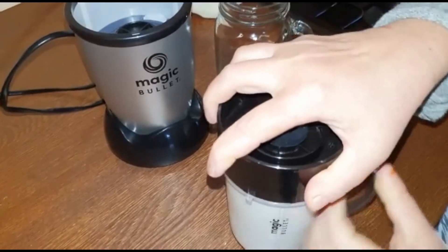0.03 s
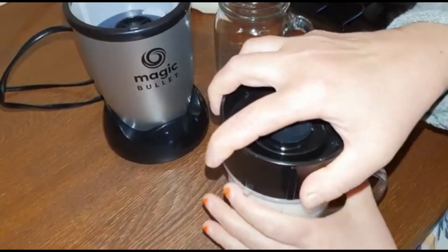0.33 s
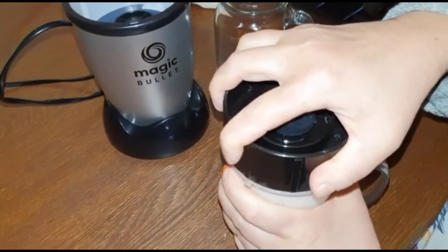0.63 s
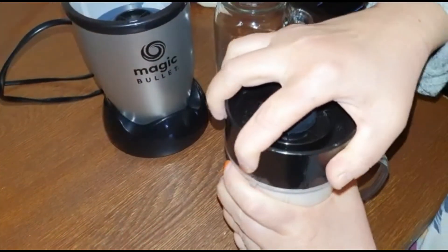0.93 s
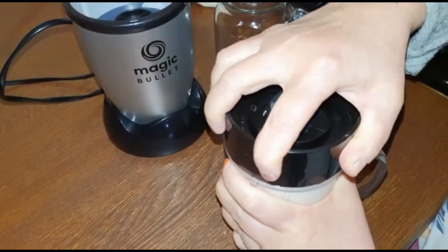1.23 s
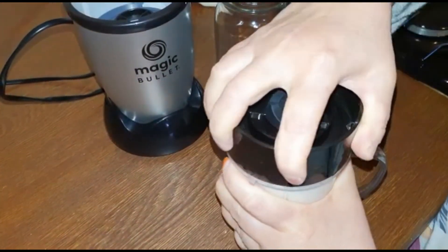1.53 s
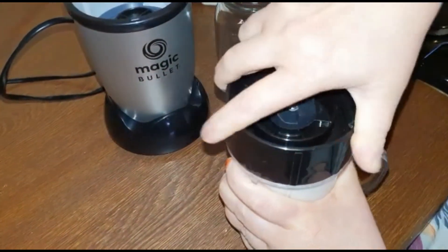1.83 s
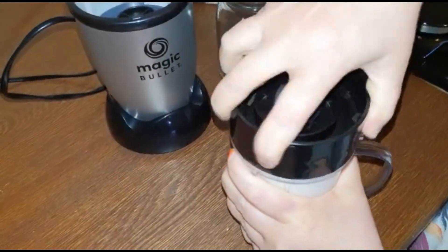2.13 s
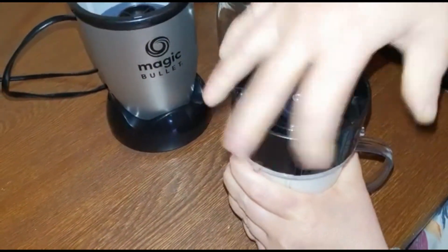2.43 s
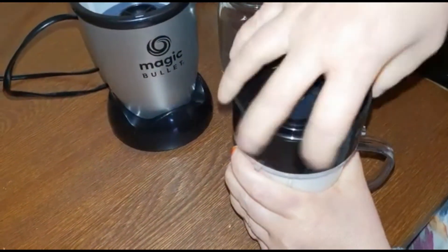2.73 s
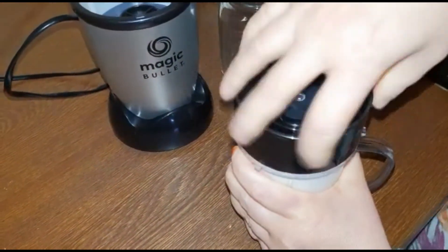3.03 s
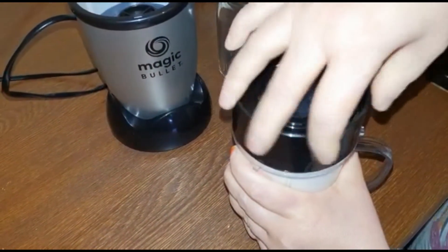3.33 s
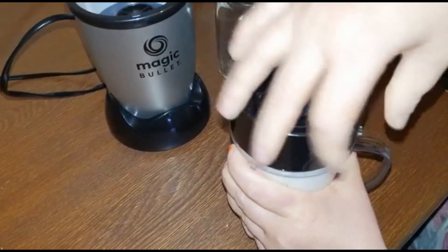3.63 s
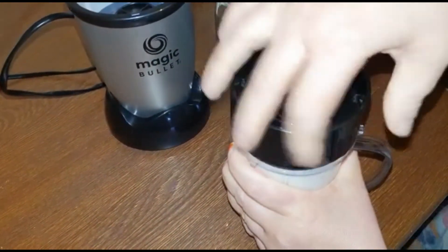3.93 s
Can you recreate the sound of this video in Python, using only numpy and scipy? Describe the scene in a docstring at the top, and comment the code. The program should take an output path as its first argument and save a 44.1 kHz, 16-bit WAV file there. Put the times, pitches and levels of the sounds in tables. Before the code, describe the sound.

A plastic lid twisted onto a cup, with clacks, hollow knocks and short gritty rubs.

```python
"""A hard plastic lid is screwed onto a cup held on a wooden table, in a small humming room.
First a faint squeak of the grip, then the loose lid clacks on the rim, the hollow cup knocks and the
table thumps under the push of the hand. After a second's lull the twists begin, each a short gritty
rub of the threads, with ticks as they catch and scuffs as the fingers regrip. From two seconds on the
clacks, knocks and thumps crowd in to the end, and hard blows leave the air in the cup ringing."""
import sys
import numpy as np
from scipy import signal
from scipy.fft import rfft, irfft
from scipy.io import wavfile

SR = 44100
rng = np.random.default_rng(int(sys.argv[2]) if len(sys.argv) > 2 else 0)


def to_wav(sig):
    """Store sig (one row per channel, or 1-D mono) as 16-bit WAV at the path in sys.argv[1].

    Samples outside -1..1 are clipped; the rate is SR.
    """
    pcm = np.clip(np.atleast_2d(sig), -1, 1) * 32767
    pcm = np.round(pcm).astype(np.int16)
    wavfile.write(sys.argv[1], SR, pcm.T)  # frames by channels


N = 176400
TIME = np.arange(N) / SR
BLOW_TIME = TIME[:SR // 3]   # seconds since the start of one blow
RUB_PAN_DB = -3.5   # left minus right


def thread_rub():
    """Dense slips of plastic on plastic swell and brighten with each twist of the lid."""
    # The twists. Each row: moment of full speed, rise and hold, all in seconds, then relative level in dB.
    twists = [(1.587, 0.087, 0.052, -65.5), (1.951, 0.026, .05, -60), (2.011, 0.0067, 0.0062, -51),
              (2.052, .03, 0.16, -66), (2.195, 0.022, 0.032, -58.5), (2.295, 0.063, 0.016, -62),
              (2.606, .05, 0.036, -51.5), (2.7, .03, 0.039, -57), (2.977, 0.071, 0.026, -49.5),
              (3.25, 0.11, 0.035, -54), (3.498, 0.039, 0.057, -53.5), (3.787, 0.035, 0.043, -52.5)]
    # Tone of the rubbing threads. Each row: frequency in Hz, relative gain in dB.
    rub_tone = [(150, 0.5), (350, 15.5), (700, 0.5), (1600, -1.5), (2600, -8), (3600, -15), (4600, -8),
                (6200, -21), (7700, -30), (8300, -8.5), (9500, -15), (11000, -11.5), (14000, -27.5),
                (15600, -32)]
    rise_db, fall_db_per_s, flutter_db = 26, 457, 3.5
    stereo_spread, edge_hz, edge_db = 0.53, 11600, 8
    power = 0
    for start, rise, hold, db in twists:
        fade_in_db = rise_db * np.maximum(start - TIME, 0) / rise
        fade_out_db = fall_db_per_s * np.maximum(TIME - start - hold, 0)
        power = power + from_db(db - fade_in_db - fade_out_db) ** 2
    grit = rms_one(slips() + stereo_spread * slips() * [[1], [-1]])
    edge = butter([slips(), slips()], 2, edge_hz, "high")
    grit = grit + from_db(edge_db) * (power / power.max()) ** 0.6 * edge   # harder pressure adds top
    rub = grit * np.sqrt(power) * from_db(-flutter_db * drift(hz=54))
    return pan(colour(rub, rub_tone), RUB_PAN_DB)


def thread_ticks():
    """Now and then the threads catch with a tiny bright tick."""
    # The catches. Each row: start in seconds, level in dB.
    catches = [(0.461, -70), (1.563, -65), (1.589, -54), (1.613, -57), (2.198, -47), (2.607, -46),
               (2.644, -51), (2.719, -38.5), (2.944, -47.5), (3.567, -49), (3.791, -51)]
    # Tone of a tick. Each row: frequency in Hz, relative gain in dB.
    tick_tone = [(1500, 4), (3300, -16), (5000, -5.5), (7600, -21), (8400, 6.5), (9500, -4), (12000, -8),
                 (15500, -28)]
    ticks = np.zeros(N)
    for start, db in catches:
        add(ticks, start, from_db(db) * rng.standard_normal(len(BLOW_TIME)) * dying(BLOW_TIME, t60=0.0085))
    return pan(colour(ticks, tick_tone), RUB_PAN_DB)


def lid_clacks():
    """The lid hits the rim: it builds to a crack or snaps at once, rattles briefly and rings."""
    # Hits on the rim. Each row: moment in seconds, level in dB, treble gain in dB,
    # left minus right in dB, build-up time of the contact in seconds.
    hits = [(0.31, -44, -33, -2.5, 0.0012), (0.523, -53.5, -20, -9, 0.0028), (2.019, -36, -3, -3, 0.0019),
            (2.317, -46.5, 2.5, 0, 0.002), (2.491, -44, -8, -1.5, 0.00082), (2.595, -44.5, 3, 2, 0.0014),
            (2.723, -31, -10, -3.5, 0.0058), (2.951, -59, -8, 4, 0.00087), (2.994, -41, 4, 4, 0.0012),
            (3.031, -32.5, 3, -3.5, 0.0031), (3.234, -35, -1, -1.5, 0.0016),
            (3.248, -32, 7.5, -2.5, 0.00093), (3.3079, -28, 7, -5, 0.0002), (3.323, -42, 4, 4, 0.0022),
            (3.462, -52, -11, 2, 0.0013), (3.54, -48, 0, 0.5, 0.00086), (3.571, -29.5, 0.5, -1.5, 0.0028),
            (3.766, -47, -7, -1, 0.0093), (3.801, -42, 3.5, -2.5, 0.013), (3.83, -31, -1, -0.5, 0.0051),
            (3.842, -29.5, -5, -1, 0.0014), (3.978, -43.5, -31, -2, 0.00082)]
    # Tone of the crack. Each row: frequency in Hz, relative gain in dB.
    crack_tone = [(150, 0), (400, 6), (900, 6.5), (1800, -1), (2700, -6), (3700, -18.5), (5000, -20),
                  (7400, -41.5), (8500, -23.5), (12000, -33), (15500, -48)]
    # Stereo image of the contact noise. Each row: frequency in Hz, left-right correlation.
    crack_likeness = [(300, 0.81), (700, 0.44), (1300, 0.08), (3000, 0.35), (12000, 0.29)]
    crack_t60_s, rattle_t60_s, rattle_db, treble_hz = 0.0083, 0.046, -29, 2490
    snap_db, snap_width_s, snap_build_s = 17, 0.00009, 0.0007
    cracks, rings = np.zeros((2, 2, N))
    contact = stereo_noise(crack_likeness)
    dull, bright = butter(contact, 3, treble_hz, "low"), butter(contact, 3, treble_hz, "high")
    pulse = BLOW_TIME / snap_width_s * np.exp(1 - BLOW_TIME / snap_width_s)
    snap = np.diff(pulse, prepend=0)
    for start, db, treble_db, pan_db, build_s in hits:
        after, before = np.maximum(TIME - start, 0), np.maximum(start - TIME, 0)
        decay = dying(after, crack_t60_s) + from_db(rattle_db) * dying(after, rattle_t60_s)
        envelope = np.exp(-before / build_s) * decay
        cracks += pan(from_db(db) * envelope * (dull + from_db(treble_db) * bright), pan_db)
        abruptness = np.exp(-build_s / snap_build_s)   # only an abrupt contact snaps
        add(cracks, start, pan(from_db(db + snap_db) * abruptness * snap, pan_db))
        add(rings, start, pan(from_db(db) * lid_ring(), pan_db))
    return colour(cracks, crack_tone) + rings


def lid_ring():
    """The struck lid rings in damped modes, in a slightly different balance each time."""
    # Modes of the lid. Each row: frequency in Hz, level against the clack in dB, t60 in seconds.
    modes = [(444, -14.5, 0.11), (637, -6, 0.021), (790, -16.5, 0.13), (900, -14.5, 0.025),
             (1214.6, -13.5, 0.097), (1441, -19, 0.11), (1593, -25, 0.18), (1724, -13, 0.051),
             (1842, -26, 0.081), (2434, -23.5, 0.062)]
    ring = 0
    for hz, db, t60 in modes:
        gain = from_db(db + rng.normal(0, 0.68)) * rng.choice([-1, 1])
        ring = ring + gain * np.sin(2 * np.pi * hz * BLOW_TIME) * dying(BLOW_TIME, t60)
    return ring * attack(BLOW_TIME, rise_s=0.0007)


def cup_knocks():
    """The hollow cup knocks; its pitch and damping shift with the grip."""
    # The knocks. Each row: start in seconds, level in dB, pitch in Hz, t60 in seconds.
    knocks = [(.306, -29.5, 399, 0.029), (.472, -34, 182.4, 0.19), (2.024, -27.5, 266, 0.072),
              (2.315, -31.5, 274, 0.064), (2.492, -36, 320, 0.039), (2.624, -28.5, 280, 0.029),
              (2.638, -34.5, 346, 0.054), (2.722, -35, 292.3, 0.13), (2.969, -29, 306, 0.025),
              (2.994, -32, 290, 0.019), (3.033, -31.5, 288, 0.036), (3.233, -32, 362, 0.068),
              (3.25, -25, 323, 0.084), (3.318, -44, 320, 0.084), (3.494, -30.5, 287, 0.023),
              (3.54, -35, 326, 0.074), (3.571, -33.5, 323, 0.041), (3.766, -32.5, 334, 0.015),
              (3.797, -25, 295, 0.043), (3.832, -30.5, 307, 0.074)]
    # Modes of the cup. Each row: multiple of the pitch, gain in dB.
    modes = [(0.999, -2), (1.472, -15), (2.398, -33)]
    return pan(soft_blows(knocks, modes, rise_s=0.0026), pan_db=0.2)


def table_thumps():
    """The wooden table gives a low thump under the push of the hand."""
    # The thumps. Each row: start in seconds, level in dB, pitch in Hz, t60 in seconds.
    thumps = [(.31, -36.5, 100, 0.048), (.468, -33.5, 103.8, 0.1), (.5, -43, 58.6, 0.079),
              (2.026, -18, 95.3, 0.069), (2.115, -34, 105.6, 0.087), (2.314, -30.5, 107, 0.077),
              (2.5, -38, 97, 0.047), (2.535, -37, 105.6, 0.088), (2.615, -33.5, 66, 0.044),
              (2.724, -22, 110.7, 0.073), (2.93, -33, 71, 0.034), (3.036, -28.5, 121, 0.063),
              (3.085, -44, 70.6, 0.13), (3.186, -31.5, 120.4, 0.13), (3.245, -31.5, 94, 0.084),
              (3.315, -29, 71, 0.016), (3.572, -25.5, 111, 0.069), (3.8, -26, 100.5, 0.087),
              (3.838, -30.5, 72, 0.048), (3.977, -29.5, 117.4, 0.051)]
    # Modes of the table. Each row: multiple of the pitch, gain in dB.
    modes = [(1, 2.5), (.62, -2.5), (1.7, -8)]
    return pan(soft_blows(thumps, modes, rise_s=0.0038), pan_db=1.26)


def soft_blows(blows, modes, rise_s):
    """A body damped by the hand swells for a moment and dies, all its modes together."""
    track = np.zeros(N)
    for start, db, hz, t60 in blows:
        envelope = attack(BLOW_TIME, rise_s) * dying(BLOW_TIME, t60)
        ring = sum(from_db(db + mode_db) * np.sin(2 * np.pi * hz * ratio * BLOW_TIME)
                   for ratio, mode_db in modes)
        add(track, start, -ring * envelope / envelope.max())
    return track


def cup_air():
    """Hard blows leave the air in the cup ringing, each at its own pitch as the lid and hand move."""
    # The hollow rings. Each row: start in seconds, level in dB, pitch in Hz.
    rings = [(2.726, -41, 483), (3.033, -46, 443), (3.31, -44, 476), (3.573, -54, 491), (3.836, -44.5, 497)]
    rise_s = 0.0069
    envelope = (1 - np.exp(-BLOW_TIME / rise_s)) * dying(BLOW_TIME, t60=0.33)
    track = np.zeros(N)
    for start, db, hz in rings:
        add(track, start, from_db(db) * np.sin(2 * np.pi * hz * BLOW_TIME) * envelope)
    return track


def finger_scuffs():
    """Skin brushes the plastic to take a new grip, and the first row adds a short burst under the lid's dull
    tap at 0.31 s: each a soft swell of slips in one broad resonance."""
    # The scuffs. Each row: middle and half-length in seconds, level in dB, band centre in Hz.
    scuffs = [(0.311, 0.003, -45.5, 950), (0.353, 0.029, -80, 2800), (0.46, 0.011, -71, 2900),
              (1.618, 0.11, -57, 300), (2.107, 0.15, -68.5, 2400), (2.642, 0.022, -48, 404),
              (2.969, 0.025, -51, 396), (3.251, 0.018, -43, 368), (3.491, 0.024, -58.5, 450),
              (3.773, 0.013, -60, 1250)]
    width_octaves = 0.7
    track, grit = np.zeros(N), slips()
    for middle, half_length, db, hz in scuffs:
        brush = butter(grit, 2, hz * 2 ** (np.array([-.5, .5]) * width_octaves), "band")
        track += from_db(db) * rms_one(brush) * np.exp(-((TIME - middle) / half_length) ** 2)
    return pan(track, pan_db=-3)


def grip_squeaks():
    """Stick and slip turns briefly regular: a wavering tone that swells, arches in pitch and fades."""
    # The squeaks. Each row: middle and half-length in seconds, level in dB, pitch in Hz,
    # glide in octaves per half-length, pitch jitter in octaves.
    squeaks = [(0.072, 0.033, -66, 2645, 0.008, 0.004), (1.923, 0.024, -54.5, 505, 0.1, 0.09),
               (1.947, 0.015, -63, 1765, 0.025, 0.011)]
    sag_octaves = 0.028   # the pitch falls off towards both ends
    track = np.zeros(N)
    for middle, half_length, db, hz, glide, jitter in squeaks:
        offset = np.clip((TIME - middle) / half_length, -4, 4)
        pitch = hz * 2 ** (glide * offset - sag_octaves * offset ** 2 + jitter * drift(hz=160))
        tone = np.sqrt(2) * np.sin(2 * np.pi * np.cumsum(pitch) / SR)
        track += from_db(db) * tone * np.exp(-offset ** 2)
    return pan(track, RUB_PAN_DB)


def room_response():
    """Strong near reflections, then a diffuse tail that dies band by band; unit energy."""
    # Decay of the room. Each row: frequency in Hz, t60 in seconds.
    decays = [(100, 0.32), (300, 0.52), (800, 0.51), (2000, 0.47), (5000, 0.18), (13000, 0.28)]
    # Stereo image of the reverb. Each row: frequency in Hz, left-right correlation.
    reverb_likeness = [(100, 1), (300, 0.94), (600, 0.95), (1200, -0.73), (3000, 0.51), (12000, -0.54)]
    t, centres_hz = TIME[:SR // 2], np.geomspace(100, 12800, num=8)
    spectrum, freqs = rfft(stereo_noise(reverb_likeness)[:, :len(t)]), np.fft.rfftfreq(len(t), 1 / SR)
    tail = 0
    for hz in centres_hz:
        band = at_hz(np.c_[centres_hz, centres_hz == hz], freqs)
        tail = tail + irfft(spectrum * band, len(t)) * dying(t, at_hz(decays, hz))
    early = 1 + from_db(5.5) * dying(t, t60=0.041)   # off the table and the things on it
    return rms_one(tail * early * attack(t, rise_s=0.0013)) / np.sqrt(len(t))


def room_tone():
    """A low rush of air with the wavering hum of a distant fan."""
    # Tone of the room's air. Each row: frequency in Hz, relative gain in dB.
    air_tone = [(25, -22), (33, -16), (44, 4), (79, 0.5), (120, -5.5), (150, -16), (200, -12.5),
                (225, -17.5), (280, -2.5), (340, -12), (420, -18), (550, -18.5), (680, -27), (790, -23),
                (950, -31), (1450, -27), (1850, -31), (2100, -41), (2500, -40.5), (3000, -51), (4000, -69),
                (7000, -121), (9000, -60), (15500, -61)]
    # Stereo image of air and fan. Each row: frequency in Hz, left-right correlation.
    air_likeness = [(50, 1), (150, 0.95), (300, 0.85), (600, 0.79), (1200, 0.054), (3000, 0.089),
                    (12000, 0.033)]
    # Hum of the fan. Each row: frequency in Hz, level in dB, bandwidth in Hz.
    hum_lines = [(273.5, -63.5, 2.7), (485.5, -73.5, 3.2), (562, -66, 2.7), (780.4, -68, 2.6),
                 (1413, -70, 1.3), (2475, -86, 11)]
    bed = from_db(-46.5) * rms_one(colour(stereo_noise(air_likeness), air_tone))
    fan_noise = stereo_noise(air_likeness)
    for hz, db, width_hz in hum_lines:
        hum = signal.lfilter(*signal.iirpeak(hz, hz / width_hz, fs=SR), fan_noise)
        bed += from_db(db) * rms_one(hum)
    return bed


def slips():
    """Friction grit: random tiny slips of uneven size; rms 1."""
    slips_per_s, spread_db = 11000, 2
    sizes = from_db(spread_db * np.minimum(rng.exponential(1, N), 4))
    return rms_one((rng.random(N) < slips_per_s / SR) * rng.choice([-1, 1], N) * sizes)


def drift(hz):
    """Random wander, mostly slower than hz; rms 1."""
    freqs = np.fft.rfftfreq(N, 1 / SR)
    return rms_one(irfft(rfft(rng.standard_normal(N)) / (1 + (freqs / hz) ** 2), N))


def stereo_noise(likeness):
    """White noise with a left-right correlation set by frequency."""
    mid, side = rfft(rng.standard_normal((2, N)))
    alike = np.clip(at_hz(likeness, np.fft.rfftfreq(N, 1 / SR)), -.999, .999)
    return irfft(np.sqrt((1 + alike) / 2) * mid + np.sqrt((1 - alike) / 2) * side * [[1], [-1]], N)


def colour(x, tone):
    """Minimum-phase EQ that keeps the power of white noise."""
    size = 2 * N
    gain = rms_one(from_db(at_hz(tone, np.fft.rfftfreq(size, 1 / SR))))
    cepstrum = irfft(np.log(gain))
    cepstrum[1:N] *= 2
    cepstrum[N + 1:] = 0
    return irfft(rfft(x, size) * np.exp(rfft(cepstrum)))[..., :N]


def butter(x, order, hz, kind):
    """Low-, high- or band-pass filter."""
    return signal.sosfilt(signal.butter(order, hz, kind, fs=SR, output="sos"), x)


def pan(x, pan_db):
    """Place a sound by its left minus right level."""
    return x * from_db([[pan_db / 2], [-pan_db / 2]])


def from_right(x, lag_s):
    """Sound from the right reaches the left side a little later."""
    return np.array([np.interp(TIME - lag_s, TIME, x[0]), x[1]])


def attack(t, rise_s):
    """Smooth rise from 0 to 1."""
    return 1 - np.exp(-(t / rise_s) ** 2)


def dying(t, t60):
    """Decay by 60 dB in t60 seconds."""
    return np.exp(-np.log(1000) * t / t60)


def from_db(db):
    """Decibels to gain."""
    return 10 ** (np.asarray(db) / 20)


def rms_one(x):
    """Scale to rms 1."""
    return x / np.sqrt(np.mean(x ** 2) + 1e-20)


def at_hz(points, hz):
    """Read a table on a log-frequency axis."""
    freqs, values = np.transpose(points)
    return np.interp(np.log(np.maximum(hz, 1)), np.log(freqs), values)


def add(track, start_s, sound):
    """Mix a sound into a track."""
    i = int(start_s * SR)
    track[..., i:i + sound.shape[-1]] += sound[..., :N - i]


def scene():
    """Lid, cup and table close by, with the room around them."""
    plastic = thread_rub() + thread_ticks() + finger_scuffs() + grip_squeaks() + lid_clacks()
    body = table_thumps() + cup_knocks()
    send = from_db(-3.5) * plastic + from_db(-5) * body
    reverb = signal.fftconvolve(send, room_response(), axes=1)[:, :N]
    return from_right(plastic, lag_s=0.00013) + body + cup_air() + reverb + room_tone()


def record(dry):
    """Steep cuts take off the deepest bass and the very top."""
    low_cut_hz, high_cut_hz = 39, 15600
    top_cut = signal.ellip(12, .1, 70, high_cut_hz, fs=SR, output="sos")
    return signal.sosfilt(top_cut, butter(dry, 10, low_cut_hz, "high"))


dry = scene()
out = record(dry)
to_wav(out)
```